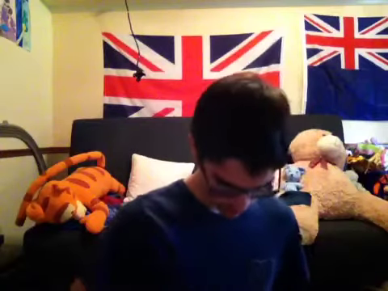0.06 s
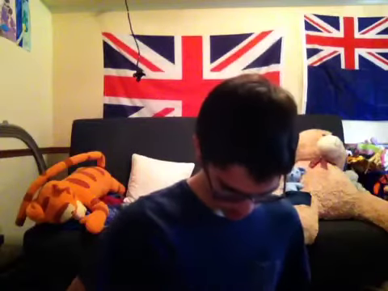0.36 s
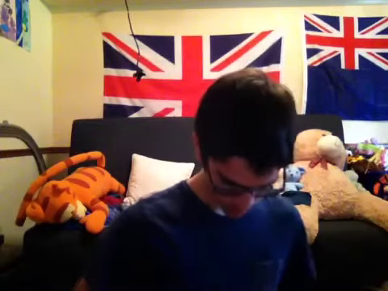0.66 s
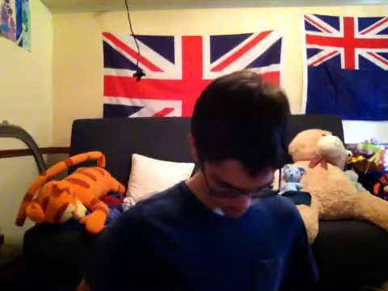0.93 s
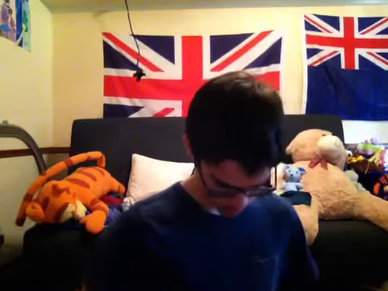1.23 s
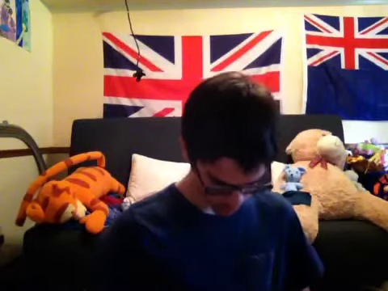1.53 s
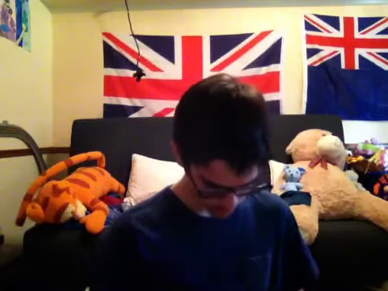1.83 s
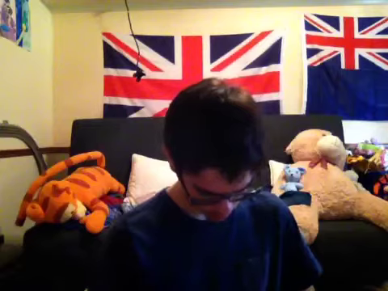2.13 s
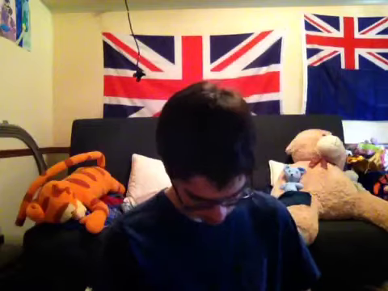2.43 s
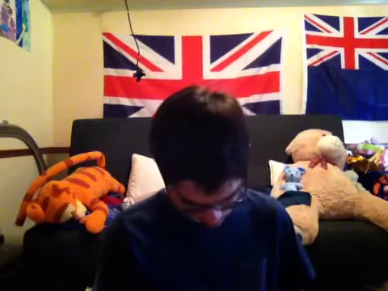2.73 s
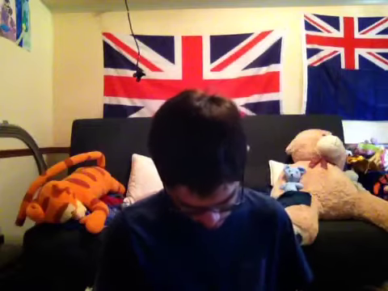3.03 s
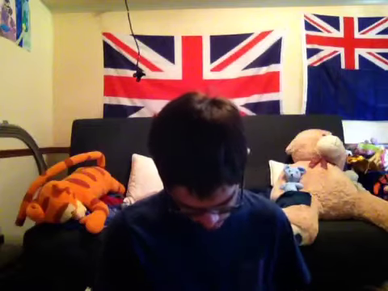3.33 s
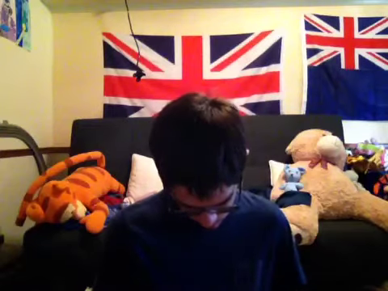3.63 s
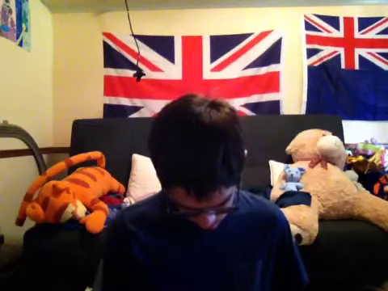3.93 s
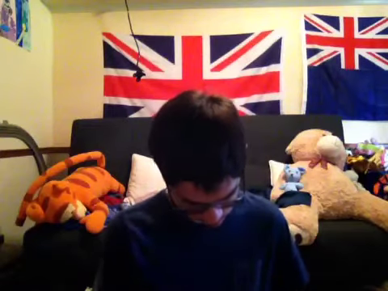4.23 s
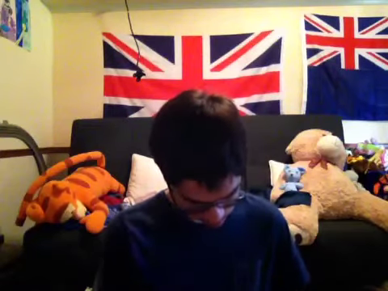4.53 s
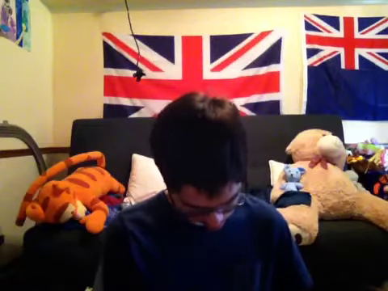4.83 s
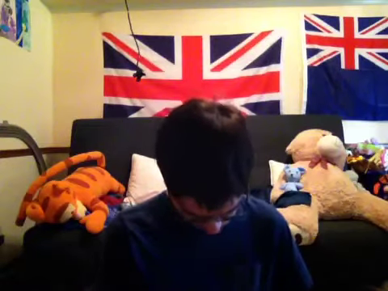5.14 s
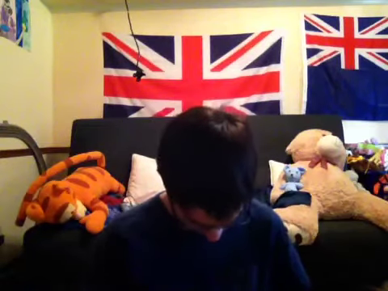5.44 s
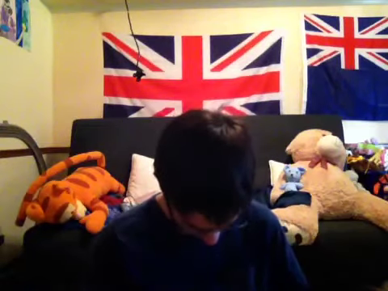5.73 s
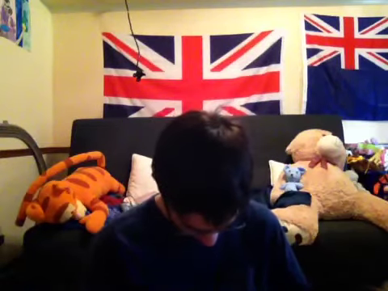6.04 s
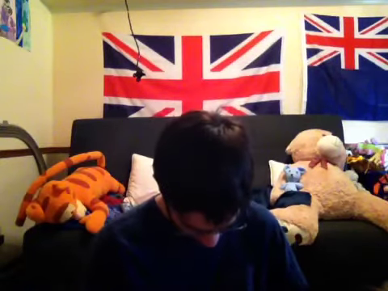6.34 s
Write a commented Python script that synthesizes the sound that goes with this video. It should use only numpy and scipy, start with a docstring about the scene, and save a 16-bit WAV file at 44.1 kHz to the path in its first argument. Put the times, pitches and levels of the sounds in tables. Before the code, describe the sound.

A pen tip picks at plastic shrink-wrap on a cardboard box, with small snaps, hollow knocks and soft crinkling.

```python
"""A pen tip picks at the shrink-wrap on a cardboard box, close up in a small, quiet bedroom.
It catches, drags and snaps free: the taut film cracks, the lid clacks and the hollow box knocks.
Between picks the box gets bumped, creases tick, fingers rub and the slack film crinkles.
Near the end a tight run of loud snaps makes a short rip. Room murmur and hiss sit underneath."""
import sys
import numpy as np
from scipy import signal
from scipy.fft import rfft, irfft, next_fast_len
from scipy.io import wavfile
from scipy.ndimage import map_coordinates

SR = 44100
rng = np.random.default_rng(int(sys.argv[2]) if len(sys.argv) > 2 else 0)


def pcm_store(signal):
    """Save signal as 16-bit PCM."""
    levels = np.round(np.clip(np.atleast_2d(signal), -1, 1) * 32767)
    wavfile.write(sys.argv[1], SR, levels.astype(np.int16).T)


N = 285667

LID_DB, LID_AT_HZ, LID_DB_PER_OCTAVE = -0.4, 3430, 8  # lid against film; lower film drives it harder
CRISP_TOP_HZ, BLUNT_TOP_HZ = 9000, 2150  # lid roll-off for each kind of contact
# Pen picks: start_s, slip_s, film_db, film_hz, knock_db, knock_hz
PEN_PICKS = [(0.5935, 0.0021, -50.5, 6200, -51.5, 380), (0.614, 0.0098, -48, 4450, -60, 420),
             (0.64, .001, -46.5, 5360, -62, 440), (0.895, 0.0036, -53, 3030, -73, 600),
             (1.195, 0.0086, -51, 3000, -54, 434), (1.268, 0.0032, -45, 12500, -55, 400),
             (1.339, 0.012, -42.5, 5900, -58, 550), (1.3711, 0.00076, -33.5, 4740, -38, 480),
             (1.374, 0.0013, -40.5, 2300, -57, 480), (1.391, .0074, -47.5, 2300, -48.5, 614),
             (1.431, 0.003, -49, 5900, -54, 280), (1.514, 0.0027, -61.5, 2400, -74, 560),
             (1.575, 0.0038, -53.5, 2500, -47.5, 280), (1.827, .005, -54, 8000, -58, 500),
             (1.85, 0.0028, -40.5, 4140, -47, 610), (1.931, 0.0016, -38, 7450, -55, 394),
             (1.993, 0.0046, -50, 10000, -57, 610), (2.022, 0.0021, -44.5, 5200, -51, 690),
             (2.059, 0.0063, -51.5, 3200, -53.5, 380), (2.590, 0.0047, -44, 8300, -44.5, 400),
             (2.876, 0.007, -43.5, 4270, -42, 675), (2.897, 0.01, -47.5, 5020, -46.5, 362),
             (2.926, 0.0068, -47.5, 7500, -44, 560), (2.9641, 0.00077, -28, 9100, -37, 513),
             (2.972, 0.00058, -41.5, 11100, -57, 393), (3.055, 0.0074, -44, 9300, -66, 378),
             (3.179, 0.007, -57, 2700, -64, 350), (3.654, 0.0024, -42.5, 4450, -44.5, 656),
             (3.774, 0.0037, -61, 2670, -56.5, 560), (3.827, 0.0064, -49, 6800, -54, 360),
             (4.8665, 0.0021, -40.5, 2800, -40, 615), (4.924, 0.002, -43.5, 2800, -37, 600),
             (4.9305, 0.0026, -31, 2400, -33, 604), (4.934, 0.0037, -29.5, 6600, -36, 760),
             (4.939, 0.0034, -31, 2420, -42, 600), (5.671, 0.0018, -47.5, 7800, -43, 417),
             (5.985, 0.0034, -40, 4530, -47.5, 527), (6.13, 0.0084, -58.5, 2420, -67, 453),
             (6.166, 0.0081, -46, 3220, -45, 590), (6.268, 0.0053, -49.5, 8040, -45.5, 358),
             (6.367, 0.0016, -52.5, 4700, -71.5, 400)]
def pen_snaps():
    """Each release of the tip cracks the film and knocks the box; slack film also slaps the lid."""
    out = np.zeros(N)
    for start_s, slip_s, film_db, film_hz, knock_db, knock_hz in PEN_PICKS:
        force = slip(slip_s)
        lid_db = film_db + LID_DB - LID_DB_PER_OCTAVE * np.log2(film_hz / LID_AT_HZ)
        add(out, start_s, film_crack(force, slip_s, film_db, film_hz))
        add(out, start_s, lid_clack(force, slip_s, lid_db, film_hz, CRISP_TOP_HZ))
        add(out, start_s, box_knock(force, slip_s, knock_db, knock_hz))
    return out


def slip(slip_s, snap_s=0.00075, attack_ratio=0.25, rough_db=4.5):
    """The force of one release: a sharp snap, then a chatter of micro-slips that swells and dies."""
    t = np.arange(SR // 5) / SR
    envelope = np.exp(-t / slip_s) * (1 - np.exp(-t / (attack_ratio * slip_s)))
    chatter = rng.standard_normal(len(t)) * amp(rough_db * rng.standard_normal(len(t)))
    force = unit_energy(chatter * envelope)
    force[0] += (snap_s / slip_s) ** 2  # short catches are mostly snap, long drags mostly chatter
    return force


# Bright crack of the film: freq_hz, gain_db
FILM_EQ = [(800, -29), (2500, -10), (3600, 0), (5500, 0.5), (7000, -1), (8700, 1), (12000, 0.5),
           (15000, -0.5), (16500, -26)]
def film_crack(force, slip_s, level_db, pitch_hz):
    """The film cracks; a slack patch rings lower and duller than a taut one."""
    def tone(f):
        band = highpass(f, 0.3 * pitch_hz) * lowpass(f, 2.83 * pitch_hz)
        return emphasis(f, pitch_hz, q=3.5, resonance_db=4.5) * band
    return radiate(force, slip_s, eq_curve(FILM_EQ), tone, level_db, wet_db=-4.5)


# Modes of the stiff lid under the wrap: pitch_hz, width_hz, gain_db
LID_MODES = [(563, 34, 2.5), (770, 70, -2.5), (913, 47, -2), (1036, 68, 0), (1194, 50, 3.5),
             (1309, 36, 0.5), (1565, 43, -4), (1652, 46, 1.5), (1857, 194, 1.5), (2115, 56, 3),
             (2230, 200, -1), (2567, 133, -1.5), (2807, 74, 0), (2943, 58, -0.5), (3273, 72, -2)]
def lid_clack(force, slip_s, level_db, pitch_hz, top_hz):
    """The lid rings, favouring the contact's pitch; a blunt contact leaves its upper modes quiet."""
    def tone(f):
        return emphasis(f, pitch_hz, q=2.5, resonance_db=1) * highpass(f, 300) * lowpass(f, top_hz)
    return radiate(force, slip_s, struck(LID_MODES, scatter_db=1.5), tone, level_db, wet_db=-5)


# Modes of the hollow box: pitch_hz, width_hz, gain_db
BOX_MODES = [(228, 110, -13.5), (379.8, 57, 1.5), (473, 34, -3), (575.4, 59, 1.5), (679, 91, -3),
             (732, 38.5, -5.5), (946, 30, -7.5)]
def box_knock(force, slip_s, level_db, pitch_hz):
    """The hollow box gives the hit its body; being small, it radiates little bass."""
    def tone(f):
        return emphasis(f, pitch_hz, q=3, resonance_db=10) * highpass(f, 300)
    return radiate(force, slip_s, struck(BOX_MODES, scatter_db=2.0), tone, level_db, wet_db=-6.5)


# Blunt hits: start_s, contact_s, knock_db, knock_hz, lid_vs_knock_db
BOX_BUMPS = [(0.096, 0.004, -60, 590, -0.5), (0.326, 0.0044, -63, 700, -3), (0.72, 0.0038, -41, 580, -7),
             (0.941, .003, -58, 500, -8), (1.054, 0.0025, -58.5, 593, -12), (1.273, 0.0016, -44, 435, -17),
             (1.696, .003, -58.5, 570, -1), (1.904, .005, -49, 570, -10), (2.742, 0.0017, -53, 540, -12),
             (3.149, .02, -50, 382, -21), (3.183, 0.009, -47.5, 350, -19), (4.07, 0.0018, -47, 450, -8),
             (4.119, .009, -51, 370, -25), (4.162, 0.0036, -46, 360, -18), (4.172, 0.0028, -54.5, 360, -10),
             (4.623, 0.0053, -46.5, 358, -12), (4.643, 0.0083, -52.5, 385, -4.5),
             (4.896, 0.0012, -47.5, 392, -5), (5.036, 0.0037, -48, 700, -3.5),
             (5.186, 0.0087, -60.5, 355, -1), (5.943, 0.0032, -53.5, 570, -1.5),
             (6.149, .006, -44, 570, -10.5), (6.417, 0.0057, -54.5, 410, -6), (6.439, .0045, -47, 444, -8),
             (6.461, 0.005, -46, 540, -21)]
def box_bumps():
    """Pen or knuckle bumps the box: mostly knock, some lid, hardly any film."""
    out = np.zeros(N)
    for start_s, contact_s, knock_db, knock_hz, lid_vs_knock_db in BOX_BUMPS:
        force = slip(contact_s)
        lid_db = knock_db + lid_vs_knock_db
        add(out, start_s, box_knock(force, contact_s, knock_db, knock_hz))
        add(out, start_s, lid_clack(force, contact_s, lid_db, knock_hz, BLUNT_TOP_HZ))
        add(out, start_s, film_crack(force, contact_s, lid_db - 5, pitch_hz=4200))
    return out


TICK_S, TICK_HZ, TICK_LID_DB = 0.0027, 7000, -12.5  # slip time, usual pitch, lid against film there
# Thin ticks of the loose film: start_s, level_db, pitch_hz
CREASE_FLIPS = [(0.198, -61, 5000), (0.243, -61.5, 5200), (0.256, -63, 6500), (0.292, -58.5, 4800),
                (0.882, -57.5, 7500), (0.999, -58, 7800), (1.080, -59.5, 9600), (1.156, -53, 5540),
                (1.260, -50, 12000), (1.318, -55, 6500), (1.749, -58.5, 11100), (1.835, -48.5, 10600),
                (2.116, -59, 7500), (2.193, -53, 12000), (2.322, -60, 8000), (2.344, -61, 2800),
                (2.953, -53, 10700), (3.320, -62, 9500), (4.287, -56.5, 11300), (4.407, -59, 10500),
                (4.624, -56.5, 10750), (5.219, -59, 8100), (5.320, -58, 11000), (5.387, -56, 9500),
                (5.405, -54, 9000)]
def crease_ticks():
    """Flipping creases are too light to move the box; the lower ones touch the lid more."""
    out = np.zeros(N)
    for start_s, level_db, pitch_hz in [*CREASE_FLIPS, *stray_flips()]:
        force = slip(TICK_S)
        lid_db = level_db + TICK_LID_DB - LID_DB_PER_OCTAVE * np.log2(pitch_hz / TICK_HZ)
        add(out, start_s, film_crack(force, TICK_S, level_db, pitch_hz))
        add(out, start_s, lid_clack(force, TICK_S, lid_db, pitch_hz, CRISP_TOP_HZ))
    return out


def stray_flips(rate_per_s=14, max_per_spell=16, over_crinkle_db=1.5, range_db=8, scatter_octaves=0.25):
    """Cues for extra creases that flip at random while the wrap is handled."""
    cues = []
    for start_s, hold_s, _, crinkle_db in HANDLING_SPELLS:
        times = start_s + rng.exponential(1 / rate_per_s, max_per_spell).cumsum()
        levels = crinkle_db + over_crinkle_db - range_db * rng.random(max_per_spell)
        pitches = TICK_HZ * 2 ** (scatter_octaves * rng.standard_normal(max_per_spell))
        cues += [(s, db, hz) for s, db, hz in zip(times, levels, pitches) if s < start_s + hold_s]
    return cues


# Crinkle of the slack film: freq_hz, gain_db
CRINKLE_EQ = [(400, -49), (1000, 6), (2500, 5.5), (4000, -1), (9000, 4.5), (15000, 3.5)]
# Spells of handling, ahead of the direct and wet gains: start_s, hold_s, rub_db, crinkle_db
HANDLING_SPELLS = [(0.095, 0.284, -74, -75), (0.628, 0.072, -62, -69), (1.19, 0.066, -68, -59.5),
                   (1.423, 0.12, -60, -58), (1.694, 0.054, -62.5, -62), (1.852, 0.2, -59.5, -56),
                   (2.104, 0.24, -61.5, -60.5), (2.36, 0.24, -59, -65.5), (2.627, 0.15, -64.5, -60),
                   (2.897, 0.11, -66, -57), (3.072, .17, -62.5, -59.5), (3.318, .17, -72.5, -65.5),
                   (3.73, 0.13, -92, -63), (4.105, 0.086, -59.5, -74), (4.389, 0.037, -60.5, -61),
                   (4.66, 0.083, -64, -65), (4.886, 0.2, -62, -57.5), (5.142, 0.15, -61, -63),
                   (5.412, 0.042, -70.5, -68), (5.666, 0.029, -59.5, -61.5), (6.15, 0.079, -57.5, -56),
                   (6.42, 0.055, -76, -58.5)]
def rub_and_crinkle(attack_s=0.03, release_s=0.022, direct_db=1, wet_db=-6.5):
    """Fingers judder over the box and the film crinkles as the grip tightens, holds and lets go."""
    rub_gain, crinkle_gain = np.zeros(N), np.zeros(N)
    for start_s, hold_s, rub_db, crinkle_db in HANDLING_SPELLS:
        t = np.arange(N) / SR - start_s
        envelope = np.exp(np.minimum(t, 0) / attack_s - np.maximum(t - hold_s, 0) / release_s)
        rub_gain = np.maximum(rub_gain, amp(rub_db) * envelope)
        crinkle_gain = np.maximum(crinkle_gain, amp(crinkle_db) * envelope)
    grip = wobble(rate_per_s=30)
    finger_slips = grains(rate_per_s=450, spread_db=0.5) * amp(4.8 * grip)
    film_slips = grains(rate_per_s=1600, spread_db=2.0) * amp(4.1 * grip)
    rub = unit_rms(filtered(finger_slips, resonances(BOX_MODES)))
    crinkle = unit_rms(filtered(film_slips, eq_curve(CRINKLE_EQ)))
    direct = rub_gain * rub + crinkle_gain * crinkle
    reverb = signal.fftconvolve(direct, room_tail(build_s=0.00093))[:N]
    return amp(direct_db) * direct + amp(wet_db) * reverb


def radiate(force, slip_s, body, tone, level_db, wet_db):
    """A force rings a body into the room; level_db sets the direct energy as an rms over 10 ms."""
    size = next_fast_len(len(force) + SR // 20)
    hz = np.fft.rfftfreq(size, 1 / SR)
    response = body(hz) * tone(hz)
    def ring(x):
        return unit_energy(irfft(rfft(x, size) * response, size)[:len(force)])
    close = signal.fftconvolve(ring(force), early_reflections())[:len(force)]
    reverb = ring(room_tail(build_s=0.00074 + slip_s)[:len(force)])
    return amp(level_db) * np.sqrt(SR / 100) * (close + amp(wet_db) * reverb)


def early_reflections(desk_db=-11, desk_s=0.0042, wall_db=-13, wall_s=0.0082):
    """Direct sound and two near reflections, which shift as the box moves in the hands."""
    impulse = np.zeros(SR // 20)
    impulse[0] = 1
    for delay_s, db in (desk_s, desk_db), (wall_s, wall_db):
        impulse[int(delay_s * SR * rng.uniform(0.85, 1.15))] += amp(db)
    return impulse


# Bedroom reverb: freq_hz, t60_s
ROOM_DECAY = [(200, 0.51), (550, 0.24), (1500, 0.26), (4000, 0.24), (12000, 0.22)]
def room_tail(build_s):
    """The room's diffuse tail builds up, then dies, sooner in the treble."""
    hz, t, noise = signal.stft(rng.standard_normal(SR // 3), SR, nperseg=256)
    decay = amp(-60 * t / along(ROOM_DECAY, hz)[:, None])
    tail = signal.istft(noise * decay, SR, nperseg=256)[1]
    fade_in = 1 - np.exp(-np.arange(len(tail)) / SR / build_s)
    return unit_energy(tail * fade_in)


# Background bed: freq_hz, gain_db
ROOM_TONE_EQ = [(25, -24), (50, -24.5), (80, -13), (125, -7.5), (172, 4), (210, 1.5), (300, -7.5),
                (600, -8.5), (1000, -15), (2000, -16.5), (5000, -17), (12000, -17), (15500, -21.5)]
def room_tone(level_db=-63.5):
    """Low room murmur under even microphone hiss."""
    bed = filtered(rng.standard_normal(N), lambda hz: amp(along(ROOM_TONE_EQ, hz)))
    return amp(level_db) * unit_rms(bed)


def struck(modes, scatter_db):
    """Each contact excites the modes at new strengths."""
    return resonances([(hz, width, db + scatter_db * rng.standard_normal()) for hz, width, db in modes])


def resonances(modes):
    """Response of ringing modes, summed with alternating polarity."""
    return lambda f: sum((-1) ** k * amp(db) * 1j * f * width / (hz * hz - f * f + 1j * f * width)
                         for k, (hz, width, db) in enumerate(modes))


def emphasis(f, pitch_hz, q, resonance_db):
    """A flat path plus one resonance: the struck spot favours its own pitch."""
    return 1.5 + resonances([(pitch_hz, pitch_hz / q, resonance_db)])(f)


def highpass(f, corner_hz):
    """One-pole bass cut."""
    return 1j * f / (1j * f + corner_hz)


def lowpass(f, corner_hz):
    """One-pole treble cut."""
    return 1 / (1 + 1j * f / corner_hz)


def eq_curve(points):
    """Minimum-phase EQ through (freq_hz, gain_db) points."""
    def response(hz):
        cepstrum = irfft(np.log(amp(along(points, hz))))
        half = len(cepstrum) // 2
        cepstrum[1:half] *= 2
        cepstrum[half + 1:] = 0
        return np.exp(rfft(cepstrum))
    return response


def grains(rate_per_s, spread_db):
    """Tiny slips of uneven size at random moments."""
    clicks = (rng.random(N) < rate_per_s / SR) * rng.standard_normal(N)
    return unit_rms(clicks * amp(spread_db * np.clip(rng.standard_normal(N), -2, 2)))


def wobble(rate_per_s):
    """A smooth curve through random knots."""
    knots = rng.standard_normal(int(N * rate_per_s / SR) + 4)
    return map_coordinates(knots, [np.arange(N) * rate_per_s / SR])


def filtered(x, response):
    """Play x through a frequency response."""
    size = 2 * next_fast_len(len(x))
    return irfft(rfft(x, size) * response(np.fft.rfftfreq(size, 1 / SR)), size)[:len(x)]


def along(points, hz):
    """Read (freq_hz, value) points on a log frequency axis."""
    freqs, values = np.transpose(points)
    return np.interp(np.log(hz + 1), np.log(freqs + 1), values)


def amp(db):
    """Decibels to gain."""
    return 10 ** (np.asarray(db) / 20)


def unit_rms(x):
    """Scale to rms 1."""
    return x / np.sqrt(np.mean(x ** 2) + 1e-20)


def unit_energy(x):
    """Scale to energy 1."""
    return x / np.linalg.norm(x)


def add(out, start_s, sound):
    """Mix a sound in at its cue."""
    start = round(start_s * SR)
    out[start:start + len(sound)] += sound[:max(N - start, 0)]


def scene():
    """The box in front of one microphone."""
    return (room_tone() + rub_and_crinkle() + pen_snaps() + box_bumps() + crease_ticks())[None]


TOP_HZ = 15700
def record(dry):
    """The microphone's band limit cuts the top end off steeply."""
    return np.array([filtered(x, lambda hz: 1 / np.sqrt(1 + (hz / TOP_HZ) ** 160)) for x in dry])


dry = scene()
out = record(dry)
pcm_store(out)
```